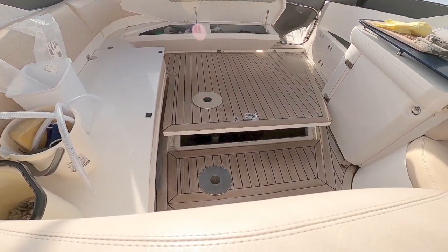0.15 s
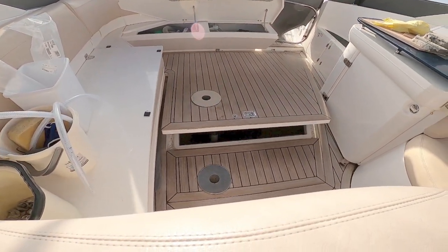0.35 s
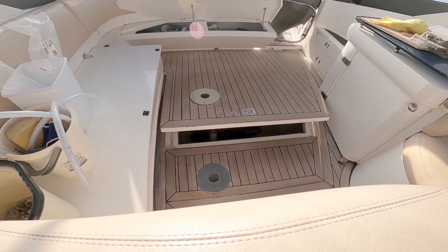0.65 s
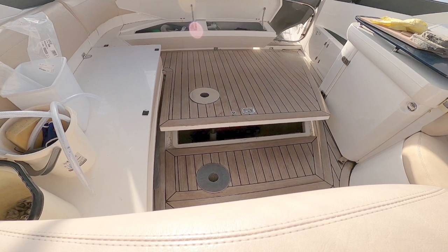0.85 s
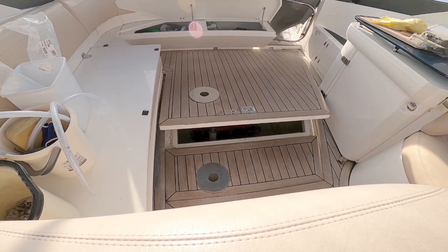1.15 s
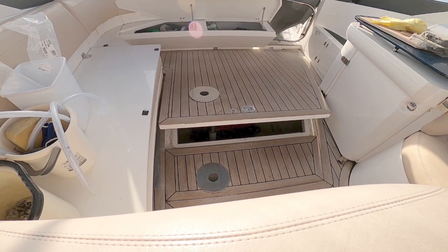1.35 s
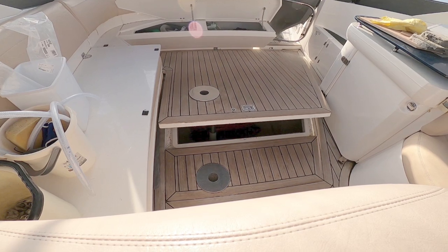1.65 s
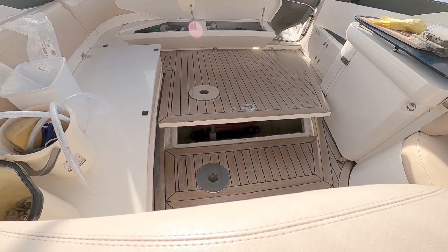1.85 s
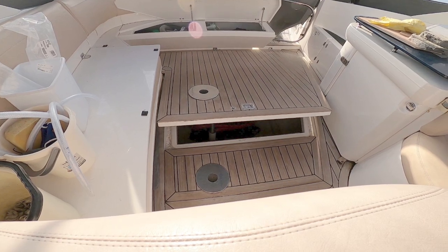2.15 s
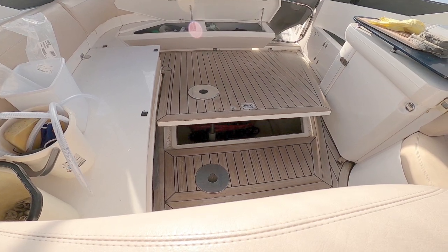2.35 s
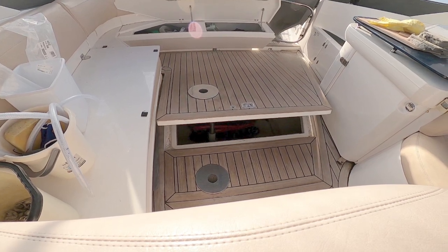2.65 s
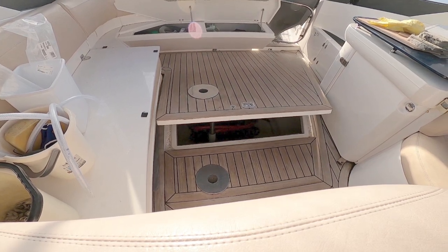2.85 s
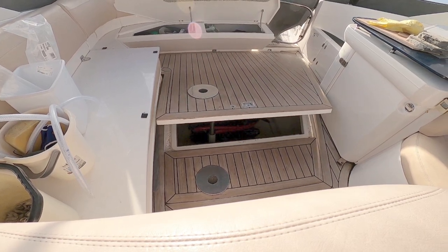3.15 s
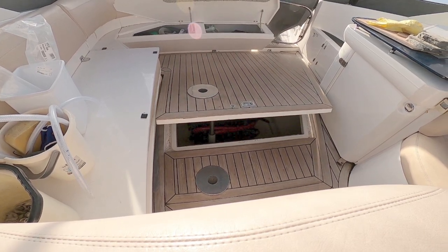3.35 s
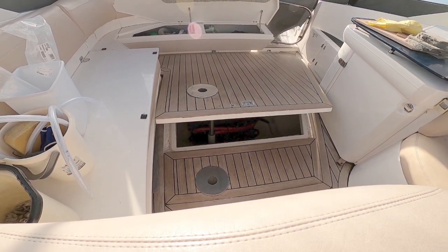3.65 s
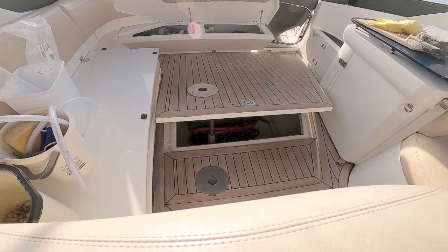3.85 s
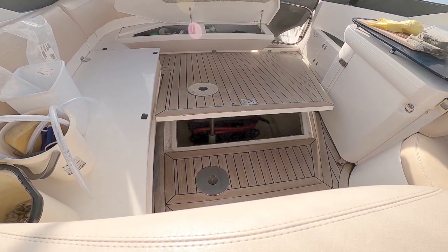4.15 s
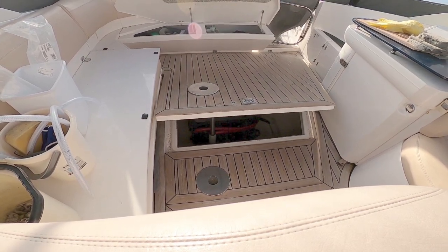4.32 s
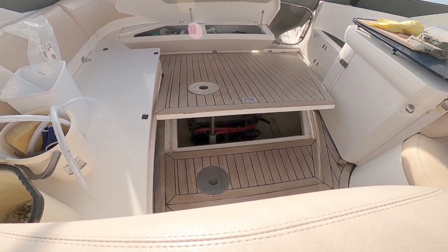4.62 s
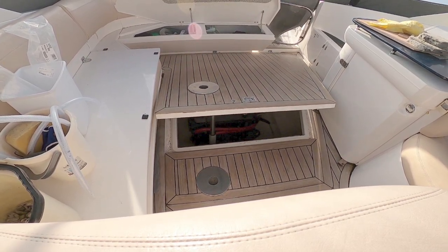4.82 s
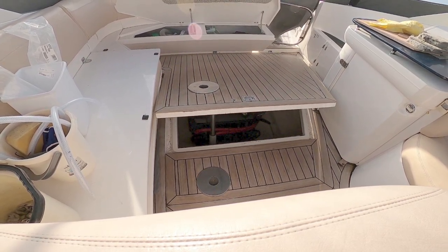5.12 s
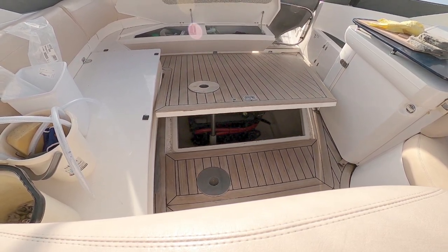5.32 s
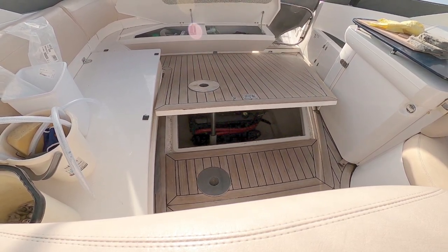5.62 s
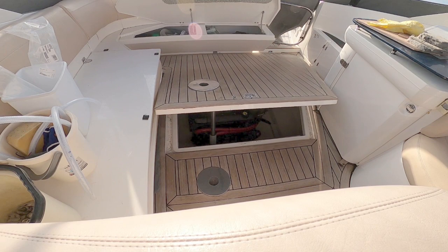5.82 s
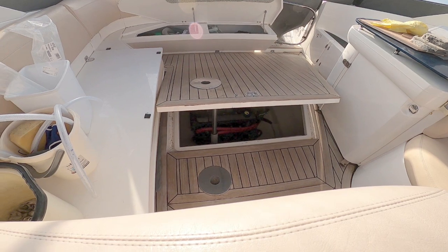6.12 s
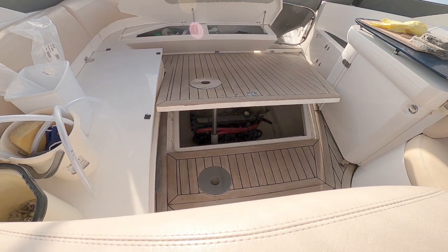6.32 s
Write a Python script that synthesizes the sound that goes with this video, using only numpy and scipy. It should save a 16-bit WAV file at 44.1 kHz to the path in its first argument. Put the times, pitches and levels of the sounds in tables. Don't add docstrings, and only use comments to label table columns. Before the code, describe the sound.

On a boat's open deck, an electric ram slowly raises an engine hatch. A low, steady motor hum carries a grinding gear whine, fluttering quickly with small worn-tooth knocks and pulsing gently as the screw binds. Soft wind and water rumble swells underneath. The motor never stops; a dull deck bump lands at the end. One fixed microphone nearby, mono.

```python
import sys
import numpy as np
from scipy import signal
from scipy.fft import rfft, irfft, next_fast_len
from scipy.io import wavfile
from scipy.ndimage import uniform_filter1d, map_coordinates

SR = 44100
rng = np.random.default_rng(int(sys.argv[2]) if len(sys.argv) > 2 else 0)


def attenuation_scalar(level_db):
    decades = np.asarray(level_db, float) / 20
    return 10 ** decades


def waveform_to_disk(signal):
    frames = np.transpose(np.atleast_2d(signal))
    scaled = np.clip(frames, -1, 1) * 32767
    samples = np.round(scaled).astype(np.int16)
    wavfile.write(sys.argv[1], SR, samples)


N = 285768
TIME_S = np.arange(N) / SR

OPENING_S = [0.251, 1.8, 3.401, 5.902]

# freq_hz, density_db
HULL_SPECTRUM = [(8.8, -37), (15, -6), (38, 1), (55, 4), (75, -10.5), (95, -15.5), (120, -27.5),
                 (210, -120)]
# centre_s, over_calm_db
GUSTS = [(.25, 3), (1.25, 0), (1.57, 6.5), (1.9, 7.5), (2.5, 4), (3.45, 3), (4.05, 6), (4.3, 6.5),
         (4.62, 9), (4.87, 7), (5.7, 2), (6.17, 6.5), (6.45, 9)]
# freq_hz, density_db
DECK_SPECTRUM = [(60, -120), (80, 4), (110, -3), (150, -2), (220, -120)]
# freq_hz, density_db
AIR_SPECTRUM = [(8000, -120), (9500, 1), (11000, -2.5), (13500, -3.5), (14500, -120)]
# time_s, level_db
AIR_LEVEL = [(0, -96), (3, -92), (5.8, -90), (5.95, -83.5), (6.48, -86)]
# freq_hz, level_db
MAINS = (100.25, -48.5)
# start_s, freq_hz, level_db, t60_s
BUMPS = [
    (6.385, 80, -24.5, 0.25),
    (6.392, 268, -35.5, 0.24),
    (6.44, 42, -46, 0.17),
]

# time_s, speed_hz
SHAFT_SPEED = [(0, 131.49), (0.25, 131.62), (0.75, 132.4), (1.1, 131.16), (1.45, 130.81), (1.8, 129.82),
               (3.2, 129.93), (4.1, 129.06), (4.9, 129.31), (6.48, 129.12)]
# time_s, level_db
SHAFT_HUM = [(0, -38), (.1, -34), (.24, -38.5), (1.45, -35.5), (1.9, -33.5), (2.6, -34), (3.1, -34.8),
             (4.6, -34.5), (6.48, -37.5)]
# time_s, level_db
THIRD_ORDER = [(0, -41), (.3, -43.5), (.8, -42), (1.1, -48.5), (1.5, -49.5), (1.75, -64), (6.48, -67.5)]
CLEAN_LINES = [(36.23, -66, -69, -62, -63), (66, -71, -68, -66, -65), (120.7, -62, -62.5, -63.5, -67),
               (127, -61.5, -60, -62, -84)]

# freq_hz, power_share (0-1)
REPEAT = [(200, .9), (1400, .85), (2000, .6), (3000, .5), (4000, .22), (8000, .2)]
# freq_hz, density_db
RUMBLE_SPECTRUM = [(82, -35.5), (140, -11.5), (165, -19.5), (2050, -20.5), (2500, -24), (4000, -20),
                   (5600, -38.5), (12300, -130)]
RUMBLE_DB = [-44, -44.5, -45, -43.5]
# freq_hz, gain_db_per_opening x4
LID = [(140, 2.5, -1.5, -3.5, -2.5), (182, 2.5, -3, -2.5, 0.5), (248, 1.5, 3, 5, -4.5),
       (400, 0, -4, -5, -2.5), (800, -0.8, -6, -2, -2), (1250, -2, -1.3, 0.5, -5.5),
       (1620, 1.5, -2.5, -2.5, -0.5), (2050, -1.3, -2.4, -0.8, -0.6)]
# freq_hz, width_hz, level_db_per_opening x4
CASING = [(742, 26, -60.5, -67.5, -90, -69), (1035, 32, -82, -75, -63.5, -61.5),
          (1049, 69, -67.5, -66, -91, -66.5), (537, 29, -70, -69.5, -63.5, -59),
          (1271, 160, -60, -74.5, -64, -55), (1730, 27, -72, -63.5, -76, -85),
          (2032, 98, -51, -76, -58.5, -61), (2940, 180, -62.5, -70, -56, -77),
          (3114, 57, -63.5, -63, -61, -64), (4130, 81, -61, -61, -56, -59),
          (4195, 45, -59, -67.5, -61, -64), (4380, 1200, -61.5, -61, -58.5, -61.5),
          (6180, 75, -71.5, -79.5, -74.5, -72), (7250, 150, -77, -85, -87, -80)]
# freq_hz, density_db
BRUSH_SPECTRUM = [(4000, -120), (5000, 7), (5400, -13), (6000, 2), (6500, -7), (7500, -9), (8300, -13.5),
                  (10000, -23.5), (12000, -43.5), (13700, -57.5), (14500, -120)]
# freq_hz, width_hz, depth (0-1)
NOTCHES = [(831, 34, 0.5), (450, 46, 0), (580, 53, 0.2), (254, 25, 0.76), (460, 23, .6)]

# casing_hz, t60_s, rise_s, level_db_per_opening x4
WORN = [(238, 0.14, 0.012, -47.5, -42, -44, -47.5), (245, 0.038, 0.0022, -55, -58, -48.5, -41.5),
        (236, 0.048, 0.0085, -55, -44, -54, -50), (407, 0.3, 0.0074, -55, -57.5, -50.5, -56.5),
        (414.4, 0.21, 0.02, -69, -52, -60.5, -55), (728.4, 0.084, 0.011, -67, -57, -54.5, -52),
        (767, 0.064, 0.0026, -43.5, -53.5, -59, -57), (1231, 0.036, 0.0022, -53, -47, -54.5, -44),
        (1260, .03, 0.0021, -60, -45.5, -49.5, -43), (1038, 0.017, 0.0027, -64, -66, -55, -45.5),
        (830, 0.0088, 0.00096, -65, -55, -51, -54), (2850, 0.0045, 0.00088, -48, -59, -45.5, -48.5),
        (2040, 0.018, 0.0016, -42, -67.5, -51, -60)]
WORN_PLACES = [.72, .6, .4, .9, .3, .62, .87, .55, .68, .85, .59, .85, .02]

MULTIPLES = [3, 4, 6, 8, 10, 12, 20, 24, 28, 32, 40]
# blur_hz, level_db_per_opening x4
MESH = [(30.3, -77, -68, -68, -58), (29.37, -71, -73.5, -61.5, -59), (40.5, -60.5, -58, -60, -57.5),
        (80, -72, -60.5, -53.5, -60.5), (67.8, -64, -63.5, -64, -61.5), (120, -77, -54.5, -66, -55.5),
        (90.5, -60.5, -58.5, -59, -56), (130, -73, -67, -69.5, -70.5), (110.5, -85, -81.5, -79, -75),
        (221.4, -80, -77, -78, -78), (152, -99, -91.5, -90, -91)]
MESH_SWING_DB = [2.2, -2, -0.9, -0.5, 0.5, 0.5, 1.5, -1, 2, -0.3, -0.5]
SECOND_DB = [-56, -52, -48.5, -48]
SECOND_SWING_DB = [.8, 1.1, 3, 2.5]
TOP_DB = [-50, -50, -48.5, -47]

REDUCTION, TEETH, START_TURNS = 16, 30, -0.16
DRIFT_DB = 1.5


def unit(x):
    return x / np.sqrt(np.mean(np.abs(x) ** 2) + 1e-20)


def curves(rows):
    s, *cols = np.transpose(rows)
    return [np.interp(TIME_S, s, c) for c in cols]


def by_opening(values):
    return np.interp(TIME_S, OPENING_S, values)


def wobble(knots_per_s):
    coarse = np.arange(0, N + 32, 32)
    knots = rng.standard_normal(int(N * knots_per_s / SR) + 4)
    return np.interp(np.arange(N), coarse, map_coordinates(knots, [coarse * knots_per_s / SR]))


def coloured(x, *spectra):
    m = next_fast_len(N + 8192)
    log_hz = np.log(np.fft.rfftfreq(m, 1 / SR) + 1)
    db = 0
    for f, level in map(np.transpose, spectra):
        db = db + np.interp(log_hz, np.log(f + 1), level)
    return unit(irfft(rfft(x, m) * attenuation_scalar(db), m)[:N])


def white():
    return rng.standard_normal(N)


def sine(cycles):
    return np.sqrt(2) * np.sin(2 * np.pi * cycles)


def once_a_turn(turn, place, sharpness):
    return np.exp(-sharpness * (1 - np.cos(2 * np.pi * (turn - place))))


def hull():
    gust_half_s = 0.1
    level_db = -46.5 + 2.7 * wobble(8)
    for s, db in GUSTS:
        level_db += db * np.exp(-((TIME_S - s) / gust_half_s) ** 2)
    return attenuation_scalar(level_db) * coloured(white(), HULL_SPECTRUM)


def deck():
    return attenuation_scalar(-56.5) * coloured(white(), DECK_SPECTRUM)


def air():
    level_db = curves(AIR_LEVEL)[0] + 0.8 * wobble(9.5)
    return attenuation_scalar(level_db) * coloured(white(), AIR_SPECTRUM)


def mains():
    hz, db = MAINS
    return attenuation_scalar(db + 0.31 * wobble(1.5)) * sine(hz * TIME_S)


def bumps():
    out, rise_s = np.zeros(N), 0.021
    for s, hz, db, t60 in BUMPS:
        age = np.maximum(TIME_S - s, 0)
        out += attenuation_scalar(db - 60 * age / t60) * np.sin(2 * np.pi * hz * age) * (1 - np.exp(-age / rise_s))
    return out


def screw_load(lag_s=0):
    screw_turn_s, tight_s = 0.692, 0.396
    return np.cos(2 * np.pi * (TIME_S - tight_s - lag_s) / screw_turn_s)


def wheel_turns():
    sag_hz = 0.685
    speed_hz = curves(SHAFT_SPEED)[0] - sag_hz * screw_load()
    return (np.cumsum(speed_hz) / SR + START_TURNS) / REDUCTION


def surface(turn, knots):
    face = rng.standard_normal((4, knots))
    creep = np.linspace(0, 3, N)
    part = creep % 1
    mixed = map_coordinates(face, [creep, turn % 1 * knots], order=1, mode="grid-wrap")
    return unit(mixed / np.hypot(part, 1 - part))


def tooth_noise(turn):
    share = np.interp(np.fft.rfftfreq(N, 1 / SR), *np.transpose(REPEAT))
    alike, chance = rfft([surface(turn, 6000), white()])
    return irfft(np.sqrt(share / 1.4) * alike + np.sqrt(1 - share) * chance, N)


def gear_rumble(rough):
    lid_hz, *lid_db = np.transpose(LID)
    out = np.zeros(N)
    for weight, db, colour_db in zip(np.eye(len(OPENING_S)), RUMBLE_DB, lid_db):
        out += by_opening(weight) * attenuation_scalar(db) * coloured(rough, RUMBLE_SPECTRUM, np.transpose([lid_hz, colour_db]))
    return out


def casing(rough):
    out = np.zeros(N)
    for hz, width_hz, *db in CASING:
        mode = signal.tf2sos(*signal.iirpeak(hz, hz / width_hz, fs=SR))
        ring = unit(signal.sosfilt(np.vstack([mode, mode]), rough))
        out += attenuation_scalar(by_opening(db) + DRIFT_DB * wobble(1.6)) * ring
    return out


def streaked(x, depth_db):
    z = signal.stft(x, nperseg=1024)[2]
    field = uniform_filter1d(rng.standard_normal(z.shape), size=3, axis=0)
    field = uniform_filter1d(field, size=70, axis=1)
    return signal.istft(z * attenuation_scalar(depth_db * unit(field)), nperseg=1024)[1][:N]


def brushes(turn):
    level_db = by_opening([-66.5, -66.0, -65.5, -64])
    level_db = level_db + 1.1 * np.cos(2 * np.pi * turn) + 0.6 * wobble(3.6)
    return attenuation_scalar(level_db) * coloured(streaked(white(), depth_db=2.2), BRUSH_SPECTRUM)


def thinned_bands(x):
    for hz, width_hz, depth in NOTCHES:
        x = x - depth * signal.lfilter(*signal.iirpeak(hz, hz / width_hz, fs=SR), x)
    return x


def engine_bay(turn):
    throb_db = 0.66 * np.cos(2 * np.pi * (turn - 0.8)) + 0.5 * surface(turn, 24) + 0.26 * wobble(12.0)
    rough = tooth_noise(turn) * attenuation_scalar(throb_db)
    return thinned_bands(gear_rumble(rough) + casing(rough) + brushes(turn))


def worn_teeth(turn):
    out, t = np.zeros(N), np.arange(SR // 8) / SR
    for place, (hz, t60, rise, *db) in zip(WORN_PLACES, WORN):
        blows = np.zeros(N)
        at = np.flatnonzero(np.diff(np.floor(turn - place)) > 0)
        blows[at] = attenuation_scalar(1.4 * rng.standard_normal(len(at)))
        ring = np.sin(2 * np.pi * hz * t) * attenuation_scalar(-60 * t / t60) * (1 - np.exp(-t / rise)) ** 2
        out += attenuation_scalar(by_opening(db)) * signal.oaconvolve(blows, ring / np.abs(ring).max())[:N]
    return out


def tone(turn, cycles):
    return sine(cycles * turn + rng.random())


def blurred(turn, cycles, blur_hz):
    knots = max(round(blur_hz / 8), 2)
    repeat = np.interp(cycles * 8, *np.transpose(REPEAT))

    def drift():
        return np.sqrt(repeat) * surface(turn, knots) + np.sqrt(1 - repeat) * unit(wobble(blur_hz))

    return unit(np.real((drift() + 1j * drift()) * np.exp(2j * np.pi * cycles * turn)))


def shaft_hum(turn):
    wheel = 2 * np.pi * (turn - 0.9)
    bend_cycles = 0.14 * np.sin(wheel) / (2 * np.pi)
    hum = (1 + 0.086 * np.cos(wheel)) * sine(REDUCTION * turn - bend_cycles)
    return attenuation_scalar(curves(SHAFT_HUM)[0] + 0.57 + 0.6 * screw_load(lag_s=0.08)) * hum


def third_order(turn):
    chatter = 0.7 * np.exp(-4.5 * np.arange(N) / N) + 0.22
    dip = 1 - chatter * once_a_turn(turn, place=0.58, sharpness=1.6)
    return attenuation_scalar(curves(THIRD_ORDER)[0]) * dip * tone(turn, 3 * REDUCTION)


def clean_lines(turn):
    return sum(attenuation_scalar(by_opening(db) + 1.5 * wobble(5)) * tone(turn, k) for k, *db in CLEAN_LINES)


def second_mesh(turn):
    slack = 0.48 * once_a_turn(turn, place=0.2, sharpness=3.5)
    catch = by_opening([3.9, 1.2, 0.36, 1.2]) * once_a_turn(turn, place=0.4, sharpness=8)
    steady = (1 - slack + catch) * tone(turn, 2 * TEETH)
    level_db = by_opening(SECOND_DB) + by_opening(SECOND_SWING_DB) * screw_load()
    return attenuation_scalar(level_db) * unit(steady + 0.46 * blurred(turn, 2 * TEETH, blur_hz=29.77))


def top_mesh(turn):
    steady = by_opening([0.23, 0.25, 0.3, 0.77]) * tone(turn, 16 * TEETH)
    level_db = by_opening(TOP_DB) + 1.1 * wobble(2.96)
    return attenuation_scalar(level_db) * unit(steady + blurred(turn, 16 * TEETH + 3, blur_hz=89.25))


def mesh_ladder(turn):
    out = np.zeros(N)
    for k, swing_db, (blur_hz, *db) in zip(MULTIPLES, MESH_SWING_DB, MESH):
        level_db = by_opening(db) + swing_db * screw_load() + DRIFT_DB * wobble(1.62)
        out += attenuation_scalar(level_db) * blurred(turn, k * TEETH, blur_hz)
    return out


def scene():
    turn = wheel_turns()
    surroundings = hull() + deck() + air() + mains() + bumps()
    shaft = shaft_hum(turn) + third_order(turn) + clean_lines(turn)
    mesh = second_mesh(turn) + top_mesh(turn) + mesh_ladder(turn)
    return (surroundings + engine_bay(turn) + worn_teeth(turn) + shaft + mesh)[None]


def band_limit(x):
    return signal.sosfilt(signal.butter(12, 13760, fs=SR, output="sos"), x)


def record(dry):
    return band_limit(dry)


dry = scene()
out = record(dry)
waveform_to_disk(out)
```